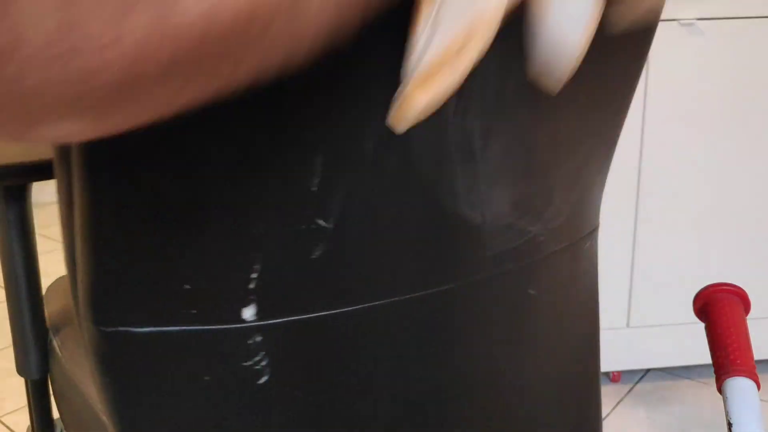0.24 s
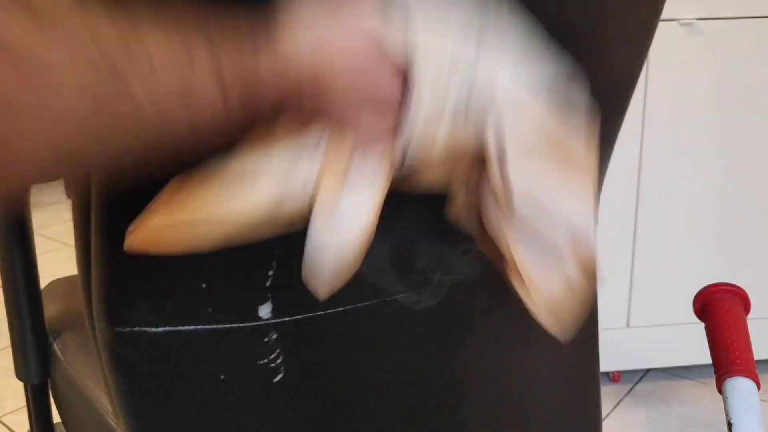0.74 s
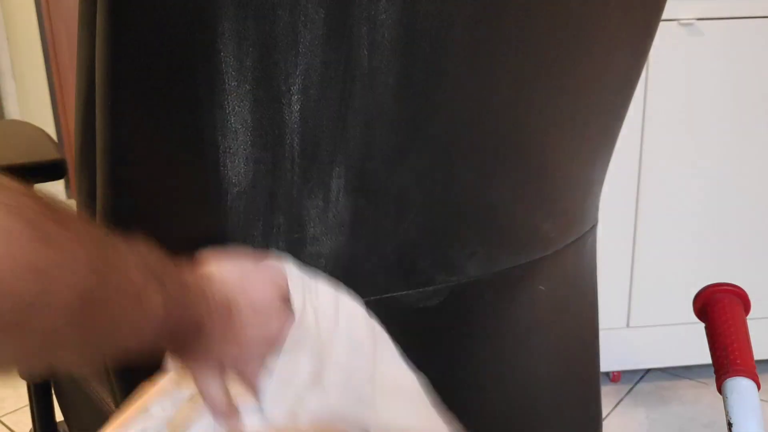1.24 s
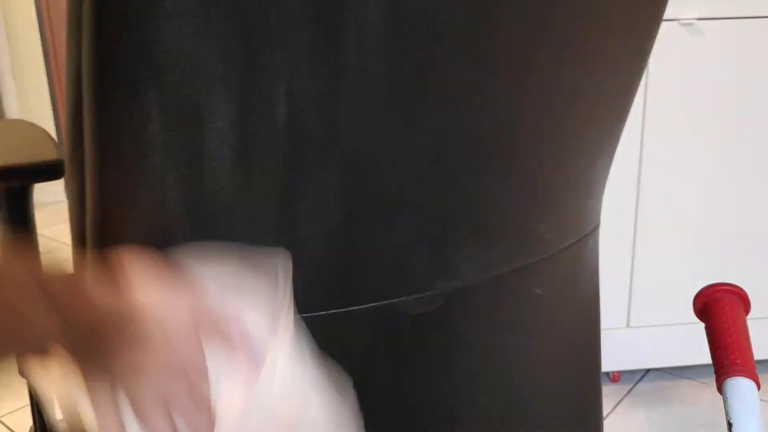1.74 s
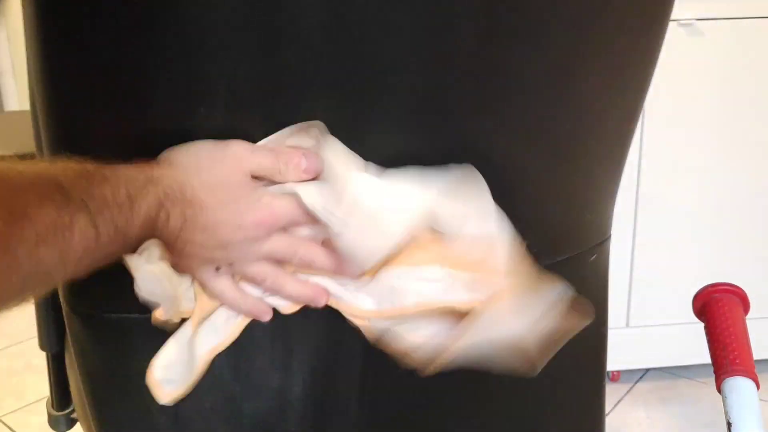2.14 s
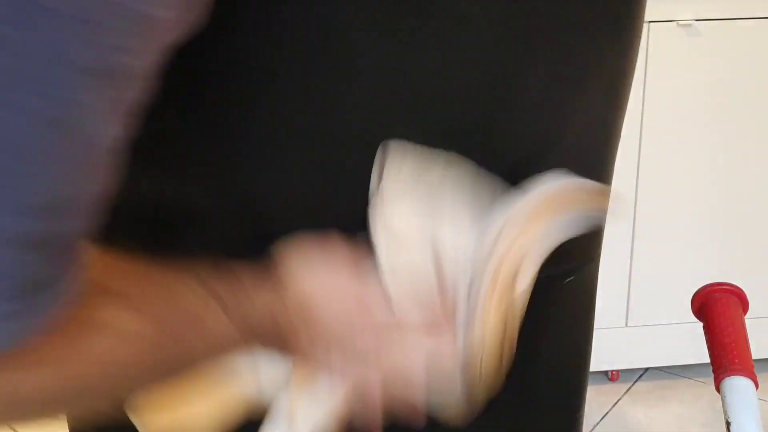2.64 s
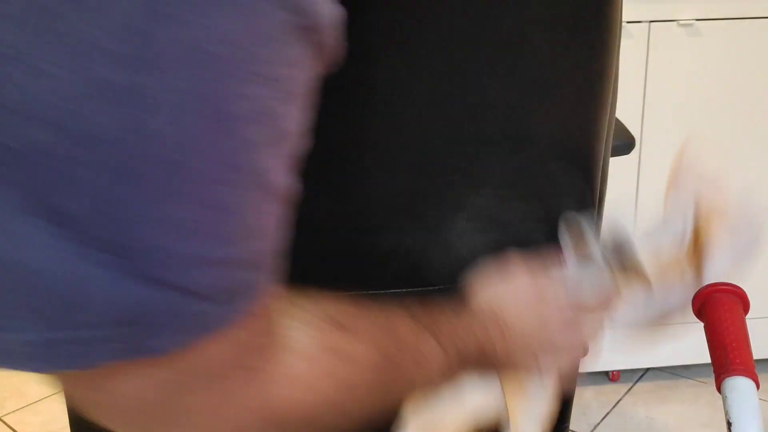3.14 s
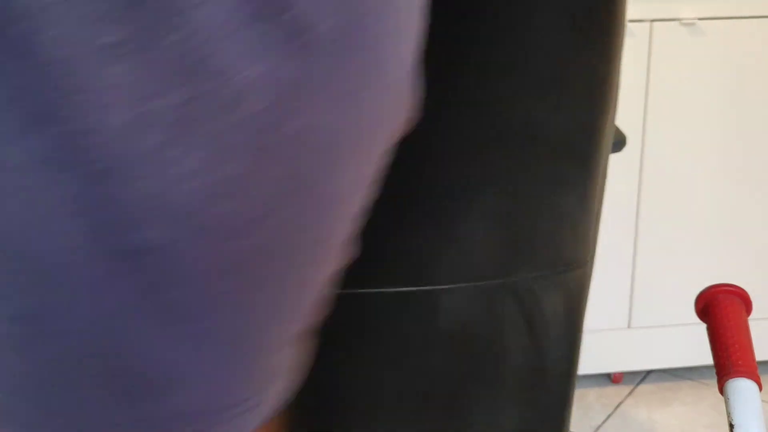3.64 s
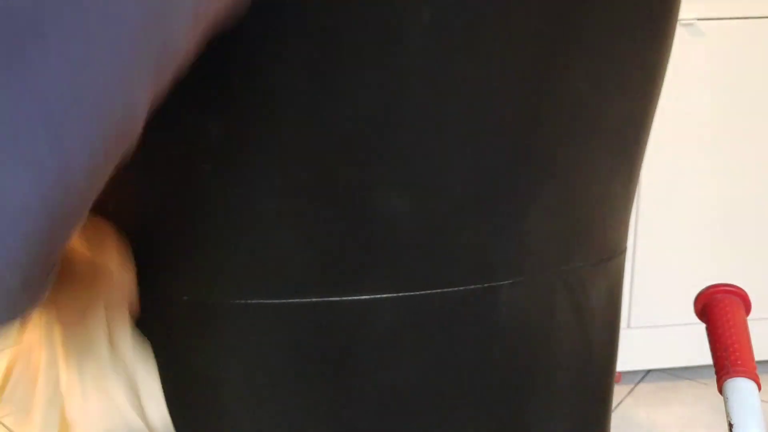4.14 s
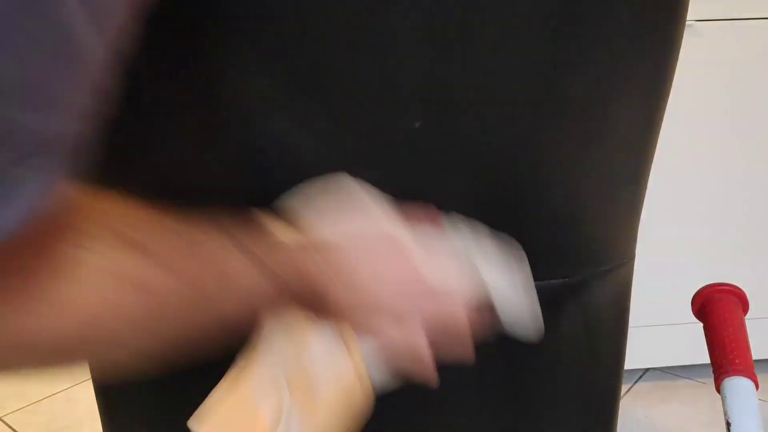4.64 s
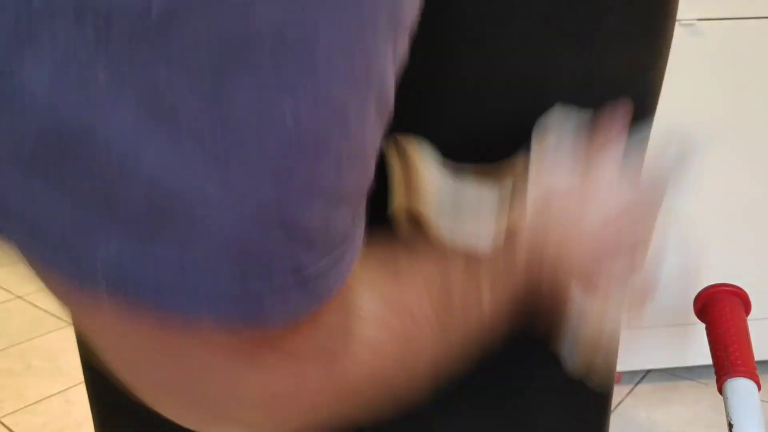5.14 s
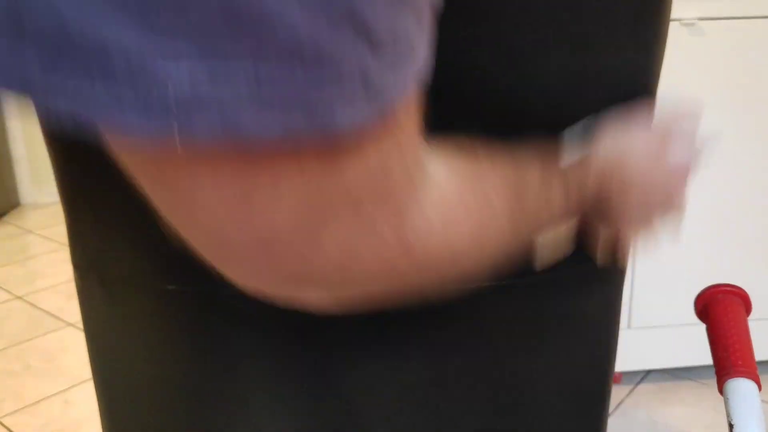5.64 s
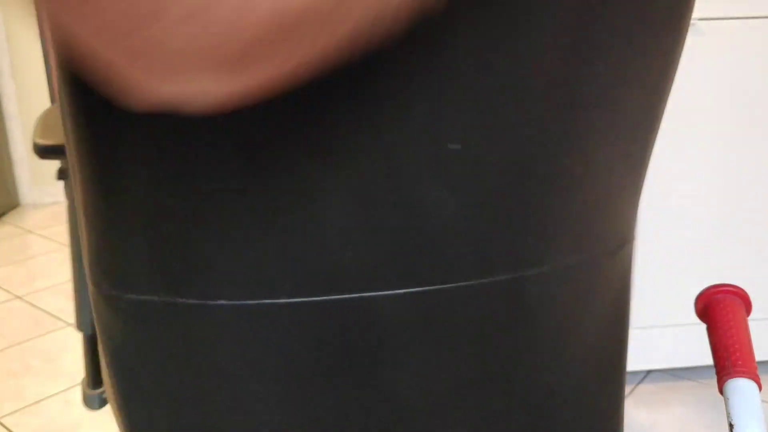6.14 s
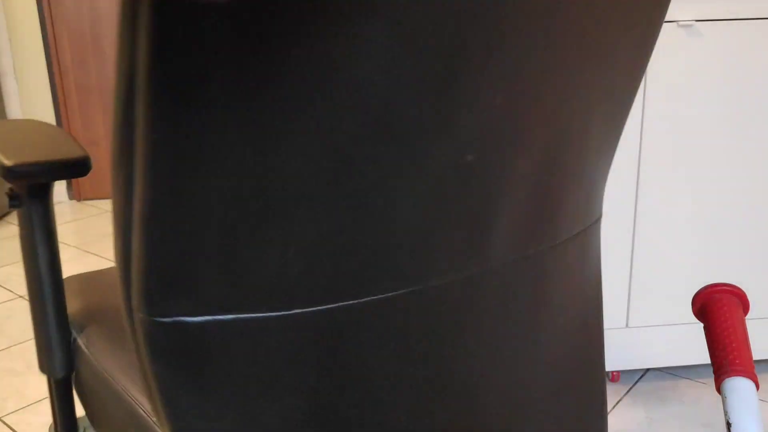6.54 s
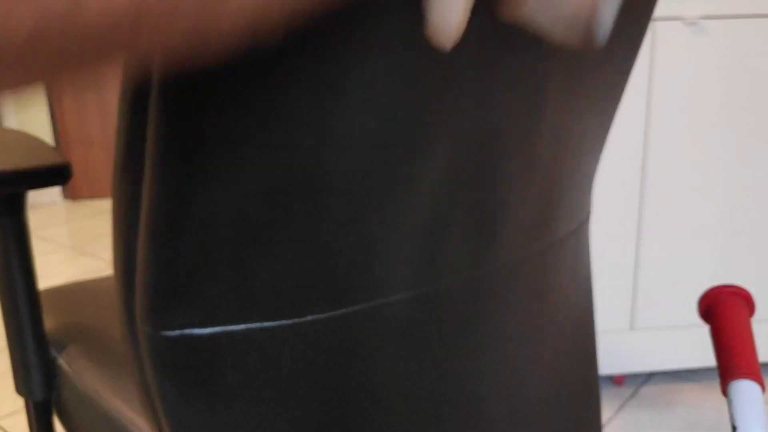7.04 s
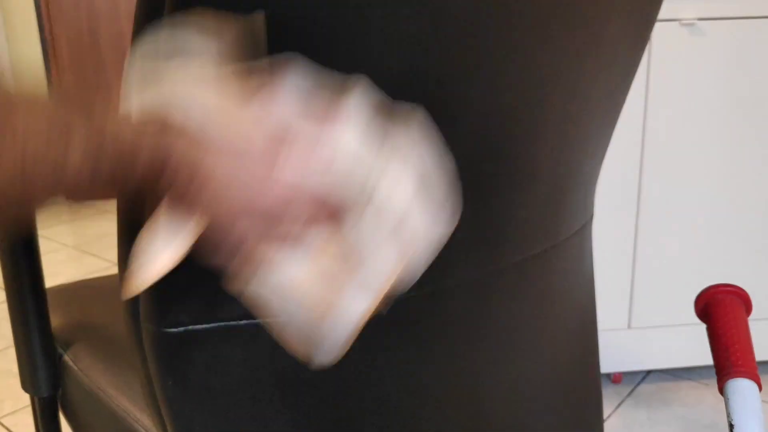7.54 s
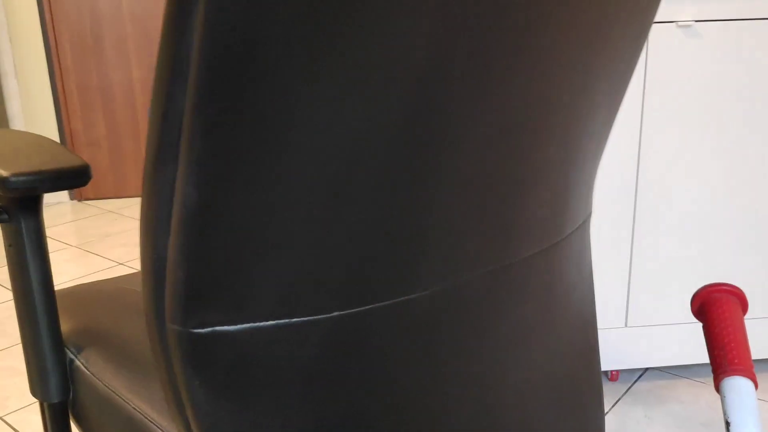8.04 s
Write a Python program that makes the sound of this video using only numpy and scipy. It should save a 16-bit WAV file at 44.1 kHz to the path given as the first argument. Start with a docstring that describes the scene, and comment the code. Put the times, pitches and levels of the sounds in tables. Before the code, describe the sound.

A cloth rag wipes the leather back of an office chair from the start, in quick, uneven strokes, about four a second, each a dry swelling hiss. Soft padded thuds and slight stirs of air follow the hand. A loose end slaps the leather loudest at about 0.5 seconds, with lighter slaps near 1.2, 2 and 5.1 seconds. Shoves draw short, low booms from the chair, strongest around 2 and 2.8 seconds, where the rag also catches an edge with one sharp tick. Now and then the cloth grips in a very brief groan, as near 1.6, 3, 4.9 and 7.3 seconds. The wiping is somewhat softer from 3 to 6 seconds, firms up again, then eases around 8 seconds. The stereo microphone is close to the chair, in a small tiled room with quiet room tone and a faint appliance hum.

```python
"""A quick to-and-fro hiss: a cloth rag wiping the leather back of an office chair, its fibres catching
on the grain. Small tiled room, stereo microphone close to the chair. The bunched cloth drums on the
padding and the arm stirs the air, over quiet room tone and a faint appliance hum. Loose ends slap the
leather at the turns, shoves make the chair back boom, the rag grips in short groans, and once it ticks
on an edge."""
import sys
import numpy as np
from scipy import signal
from scipy.fft import rfft, irfft
from scipy.io import wavfile
from scipy.ndimage import uniform_filter1d

SR = 44100
rng = np.random.default_rng(int(sys.argv[2]) if len(sys.argv) > 2 else 0)


def generate_wav(signal):
    """Clip the signal to [-1, 1] and save it as 16-bit WAV at the path in sys.argv[1]."""
    frames = np.transpose(np.atleast_2d(signal))
    scaled = np.clip(frames, -1, 1) * 32767
    pcm = np.round(scaled).astype(np.int16)
    wavfile.write(sys.argv[1], SR, pcm)


N = 364751
TIME, FREQ = np.arange(N) / SR, np.fft.rfftfreq(N, 1 / SR)


def amp(db):
    return 10 ** (np.asarray(db) / 20)


def unit_rms(x):
    return x / np.sqrt(np.mean(x ** 2) + 1e-20)


def curve_at(points, hz):
    """A table of (f, value), joined on a log-frequency axis."""
    f, value = np.transpose(points)
    return np.interp(np.log(hz + 1), np.log(f + 1), value)


def add(mix, start_s, sound):
    part = mix[max(round(start_s * SR), 0):][:len(sound)]
    part += sound[:len(part)]


def wander(rate_hz):
    """Smooth random drift of unit size, up to about the given rate."""
    return unit_rms(irfft(rfft(rng.standard_normal(N)) / (1 + (FREQ / rate_hz) ** 4), N))


def swells(rows):
    """Half a sine for each row of (middle t/s, length/s, height)."""
    out = np.zeros(N)
    for s, length, height in rows:
        add(out, s - length / 2, height * np.sin(np.linspace(0, np.pi, round(length * SR))))
    return out


# Stereo width at the microphone: f/Hz, side minus mid level/dB
WIDTH = [(30, -16), (150, -17), (350, -12.5), (550, -7), (1000, -3.2), (2000, -1.2), (4000, 0)]
def at_microphone(pair, colour, band_hz):
    """Colours two noises, unit mid level in the band; long waves reach both microphone ports alike."""
    mid, side = rfft(pair) * amp(curve_at(colour, FREQ))
    side = side * amp(curve_at(WIDTH, FREQ))
    level = np.std(irfft(mid * (FREQ > band_hz[0]) * (FREQ < band_hz[1]), N))
    return irfft(np.array([mid + side, mid - side]), N) / level


def slips(per_s, spread_db, share):
    """Friction force: countless tiny slips blur into noise, and a share of larger catches stands out."""
    sizes = amp(spread_db * np.minimum(rng.exponential(1, N), 3))
    caught = rng.random(N) < per_s / SR
    catches = unit_rms(sizes * caught * rng.choice([-1, 1], (2, N)))
    return np.sqrt(share) * catches + np.sqrt(1 - share) * rng.standard_normal((2, N))


# Sweeps of the hand, close to the microphone: fastest t/s, rise/s, fall/s, cloth hiss level/dB,
# palm rub re hiss/dB, fibre fizz re hiss/dB, palm hollow at full speed f/Hz, drumming level/dB
STROKES = [(0.014, 0.16, 0.16, -51, 0, -1, 1460, -59.5), (0.188, 0.22, 0.24, -53, 2.0, -1.5, 1740, -66),
           (0.435, 0.15, 0.17, -46, -1.5, -3, 2250, -65.5),
           (0.585, 0.18, 0.13, -51.5, -3, 2.5, 1000, -57.5),
           (0.689, 0.12, 0.27, -48, -1.5, -1, 1870, -63.5),
           (1.091, 0.24, 0.093, -45.0, -4, -3.5, 2100, -59.5),
           (1.265, 0.14, 0.19, -47, -4, -4.5, 2110, -56.5),
           (1.651, 0.28, 0.29, -50.5, -1.5, -3.0, 1650, -62.5),
           (2.022, 0.18, 0.08, -48.0, -2, -0.5, 2210, -54.5),
           (2.219, 0.18, 0.15, -48, -3.5, -1.5, 1800, -59),
           (2.43, 0.12, 0.16, -49.5, -1.5, -3, 2330, -54.5), (2.612, 0.1, 0.15, -46.5, -1, -7.5, 1370, -57),
           (2.813, 0.13, 0.15, -48, -2.5, -4, 2000, -51.5),
           (3.096, 0.35, 0.27, -52.0, 0.5, 0.5, 1440, -65.5), (3.33, 0.03, 0.12, -60.5, -2, 1, 1680, -62),
           (3.54, 0.11, 0.11, -54, -1, -2.5, 1860, -60.5),
           (3.638, 0.067, 0.32, -52.0, -4.0, -11, 1980, -62.5),
           (4.144, 0.28, 0.19, -53.5, -1.5, -3, 1450, -61),
           (4.386, 0.15, 0.12, -59.5, 2.5, -1.0, 1270, -64), (4.615, 0.2, 0.18, -51, 4, -3.5, 1310, -58),
           (4.907, 0.19, 0.09, -47.5, -2.5, 1, 1490, -69), (5.067, 0.2, 0.3, -55.5, 1.0, -5, 1380, -63.5),
           (5.546, 0.2, 0.16, -54.5, 2.5, -1, 1350, -60.5), (5.809, 0.43, 0.2, -56.5, 3, -5.5, 1670, -78),
           (6.074, 0.15, 0.097, -54.5, 4, -3.5, 1760, -67), (6.17, 0.077, 0.098, -49, 0, -13, 2130, -56.5),
           (6.432, 0.26, 0.13, -46.5, -2.5, -8, 2400, -63.5),
           (6.735, 0.27, 0.076, -47, -2.0, -14, 1820, -70), (7.003, 0.28, 0.14, -47, -2.5, -6.5, 1820, -71),
           (7.327, 0.28, 0.087, -48, -2.5, -6, 1730, -69),
           (7.599, 0.34, 0.18, -49.0, -0.5, -10.5, 1800, -69),
           (7.964, 0.29, 0.12, -57.0, 3.0, -4.5, 1510, -64), (8.213, 0.17, 0.11, -53.5, 2, -7, 1810, -69.5)]
def sweep(levels_db, power, swing=0.77, turn_pitch=0.68):
    """Amplitude growing as hand speed to a power, and the palm hollow's pitch, sinking at the turns."""
    energy, weighted_hz = np.full(N, 1e-14), np.full(N, 1e-11)
    for (s, rise, fall, *_, hollow_hz, _), db in zip(STROKES, levels_db):
        span = slice(max(round((s - rise) * SR), 0), round((s + fall) * SR))
        ramp = np.interp(TIME[span] - s, [-rise, 0, fall], [0, 1, 0])
        speed = np.clip(ramp + swing * (np.sin(np.pi / 2 * ramp) - ramp), 0, 1)  # swing 1: a pendulum
        stroke_energy = (amp(db) * speed ** power) ** 2
        energy[span] += stroke_energy
        weighted_hz[span] += stroke_energy * hollow_hz * (turn_pitch + (1 - turn_pitch) * speed)
    return np.sqrt(energy), weighted_hz / energy


# Rub under the palm, its hollow at 1400 Hz: f/Hz, relative level/dB
PALM_RUB = [(200, -29), (450, -8.5), (700, -2), (1000, -0.5), (1400, -1.5), (2000, -5.5), (3000, -12.5),
            (6000, -21)]
def folds(pair, patchy_db, hollow_hz=None):
    """Shifting folds favour one pitch, then another; the palm's hollow, if given, tunes the rub."""
    hz, t, spectra = signal.stft(pair, SR, nperseg=1024, noverlap=768)
    patches = uniform_filter1d(rng.standard_normal(spectra.shape[1:]), size=5, axis=0)
    patches = unit_rms(uniform_filter1d(patches, size=7, axis=1))
    gain = amp(patchy_db * patches)
    if hollow_hz is not None:
        slide = np.interp(t, TIME, hollow_hz) / 1400
        tuned = amp(curve_at(PALM_RUB, hz[:, None] / slide))
        gain = gain * tuned / np.sqrt(np.mean(tuned[(hz > 900) & (hz < 2200)] ** 2, axis=0))
    return signal.istft(spectra * gain, SR, nperseg=1024, noverlap=768)[1][:, :N]


# The hand bears down and the rag bites: middle t/s, length/s, extra hiss level/dB
BITES = [(.69, 0.096, 1.5), (1.078, 0.17, 1.5), (2.014, 0.087, 4), (2.196, 0.089, 4), (2.454, 0.082, 2.5),
         (2.654, 0.032, 2), (2.795, 0.032, 4.5), (2.842, .09, 5.5), (3.699, 0.13, 3), (4.631, 0.036, 1),
         (5.105, 0.13, 4.5), (6.173, 0.078, 3), (6.756, 0.083, 2.5), (7.346, .06, 3.5)]
# Close up: cloth hiss, the leather's radiation of the rub, fibre fizz: f/Hz, relative level/dB
CLOTH_HISS = [(300, -15), (900, -20), (1600, -7.5), (2400, -2), (3500, -2), (5000, -3), (7000, -1),
              (9000, -8), (14000, -12.5)]
LEATHER_RADIATION = [(300, -8), (800, -1), (2500, 1), (6000, -4)]
FIBRE_FIZZ = [(2000, -43), (5500, -4), (8500, 2), (11000, 3.5), (14000, 3)]
def wiping(creep_db=-65.5):
    """Cloth slides over the grain, still creeping at the turns; uneven grip shakes all the friction."""
    hiss_db, rub_db, fizz_db = np.transpose(STROKES)[3:6]
    sliding = np.hypot(sweep(hiss_db, power=1.22)[0], amp(creep_db))
    rubbing, hollow_hz = sweep(hiss_db + rub_db, power=1.17)
    brushing = np.hypot(sweep(hiss_db + fizz_db, power=1.08)[0], amp(creep_db - 2.5))
    grip = wander(rate_hz=18)
    bite_db = swells(BITES)
    grain = slips(per_s=3000, spread_db=3, share=.2)
    weave = slips(per_s=900, spread_db=3, share=.25)
    fibres = slips(per_s=4000, spread_db=3, share=.25)
    hiss = at_microphone(folds(grain, patchy_db=2.0), CLOTH_HISS, band_hz=(2800, 7000))
    under_palm = folds(weave, patchy_db=2.5, hollow_hz=hollow_hz)
    rub = at_microphone(under_palm, LEATHER_RADIATION, band_hz=(900, 2200))
    fizz = at_microphone(fibres, FIBRE_FIZZ, band_hz=(8500, 14000))
    # a bite lifts the fizz most, so bearing down brightens the cloth
    return (hiss * sliding * amp(bite_db + 0.68 * grip)
            + rub * rubbing * amp(0.52 + 0.79 * bite_db + 0.46 * grip)
            + fizz * brushing * amp(-0.57 + 1.7 * bite_db + 0.52 * grip))


def pressing():
    """How hard the moving hand works the padding, as an amplitude."""
    return sweep([stroke[-1] for stroke in STROKES], power=0.79)[0]


# Thuds in the chair's padding: f/Hz, relative level/dB
PADDING = [(50, -20), (100, -4.5), (135, -9), (180, -4.5), (260, -4), (400, 0), (600, -0.5), (900, -4.5),
           (1600, -14), (4000, -57)]
def drumming():
    """Folds roll under the hand and thud softly into the padding."""
    force = slips(per_s=150, spread_db=3.5, share=0.48) * amp(1.8 * wander(rate_hz=14.5))
    thuds = at_microphone(force, PADDING, band_hz=(150, 600))
    return thuds * pressing() * amp(0.96 * swells(BITES))


# Moving air at the microphone: f/Hz, relative level/dB
DRAUGHT = [(10, -1), (24, 2), (45, -3), (70, -16.5), (120, -10), (250, -23), (800, -54)]
def draught(rest_db=-66.5, re_drumming_db=-9):
    """The arm stirs a faint draught into low buffeting with each stroke."""
    buffet = at_microphone(rng.standard_normal((2, N)), DRAUGHT, band_hz=(25, 120))
    return buffet * np.hypot(amp(rest_db), amp(re_drumming_db) * pressing())


# Room tone behind the chair: f/Hz, relative level/dB
ROOM_TONE = [(30, 15), (120, -2), (300, 2), (700, 4.5), (1500, -2.5), (4000, -8), (14000, -32)]
# An appliance in the room: f/Hz, rms level/dB
HUM = [(252, -76), (510, -75.5)]
def room_tone(noise_db=-66.5):
    """Steady, quiet noise and the faintly wavering hum of an appliance."""
    out = amp(noise_db) * at_microphone(rng.standard_normal((2, N)), ROOM_TONE, band_hz=(100, 14000))
    for hz, db in HUM:
        peak = np.sqrt(2) * amp(db + 1.8 * wander(rate_hz=1.2))
        cycles = np.cumsum(hz + 3 * wander(rate_hz=12.4)) / SR
        out += peak * np.sin(2 * np.pi * cycles)
    return out


# Decay of the small tiled room: f/Hz, t60/s
ROOM_DECAY = [(150, 0.22), (600, 0.62), (2000, 0.15), (10000, 0.04)]
def reverb(dry):
    """Dense reflections off tiles and cupboards; the treble dies first."""
    hz, t, spectra = signal.stft(rng.standard_normal((2, SR // 2)), SR, nperseg=256)
    decay = amp(-60 * t / curve_at(ROOM_DECAY, hz)[:, None])
    tail = signal.istft(spectra * decay, SR, nperseg=256)[1]
    tail[:, :SR // 250] = 0  # reflections reach the microphone 4 ms late
    mid, side = signal.fftconvolve(np.atleast_2d(dry), tail / np.linalg.norm(tail[0]), axes=1)[:, :N]
    side = irfft(rfft(side) * amp(curve_at(WIDTH, FREQ)), N)
    return np.array([mid + side, mid - side])


# Loose ends hit the leather: t/s, puff level/dB, f/Hz before pitch_ratio, crack re puff/dB
FLAPS = [(0.336, -37, 1030, -1.5), (0.511, -19.5, 540, -11), (0.5189, -23.5, 376, -5.5),
         (0.525, -31, 468, -8), (0.536, -36, 125, -18), (0.539, -35, 560, -13), (0.922, -39.5, 888, -15),
         (1.1852, -28, 710, -4.5), (1.623, -46, 301, -10), (1.983, -29, 587, -11), (1.996, -33, 888, -8),
         (2.177, -34.5, 1110, 1), (2.652, -39, 832, -17), (2.818, -33, 413, -6), (4.106, -36, 409, -14),
         (4.622, -36.5, 503, -8), (4.898, -40.5, 280, 4), (5.113, -32, 330, -2), (5.124, -39, 480, 0),
         (5.1414, -27.5, 680, -9), (5.835, -40.5, 383, 3.5), (6.292, -36.5, 700, -9), (6.714, -39, 659, -8)]
# Modes of the chair back: f/Hz, level re puff/dB, t60/s
CHAIR_MODES = [(137, -19, .09), (253, -23, .12), (392, -25, .06), (513, -27, .09), (621, -28, .05),
               (823, -28, .05), (1100, -29, .05), (1268, -28, .05)]
def flaps(pitch_ratio=0.85, contact_s=0.00197, ring_rise_s=0.00079, crack_decay_s=.004):
    """Each flap squeezes out a puff of air, cracks on the leather and sets the chair back ringing."""
    t, out = np.arange(SR // 5) / SR, np.zeros(N)
    for s, db, hz, crack_db in FLAPS:
        pulse_time = np.pi * hz * pitch_ratio * (t - .002)
        puff = (1 - 2 * pulse_time ** 2) * np.exp(-pulse_time ** 2)
        ring = sum(amp(mode_db - 60 * t / t60) * np.sin(2 * np.pi * f * t + rng.uniform(0, 2 * np.pi))
                   for f, mode_db, t60 in CHAIR_MODES)
        ring *= 1 - np.exp(-t / ring_rise_s)
        # a heavier fold gives a lower puff and a duller crack
        cloth = signal.butter(3, [.5 * hz, 1300 + hz], "band", fs=SR, output="sos")
        crack = unit_rms(signal.sosfilt(cloth, rng.standard_normal(len(t)))) * np.exp(-t / crack_decay_s)
        add(out, s, amp(db) * puff)
        add(out, s + contact_s, amp(db) * (ring + amp(crack_db) * crack))
    return out + amp(-14) * reverb(out)


# Hard shoves on the chair: middle t/s, length/s, level/dB
SHOVES = [(0.507, .06, -60), (0.921, 0.058, -55), (1.26, .06, -55.5), (1.938, 0.065, -51),
          (2.007, 0.11, -48.5), (2.216, 0.067, -67), (2.417, 0.17, -53.5), (2.603, 0.091, -70),
          (2.79, .05, -49.5), (2.88, 0.061, -53), (4.379, 0.093, -54.5), (4.64, 0.054, -58),
          (4.91, 0.084, -57.5), (5.12, .09, -59), (5.86, 0.069, -55), (6.17, 0.09, -62), (6.453, 0.14, -68),
          (6.857, 0.11, -56.5), (7.37, 0.14, -56.5)]
# Boom of the chair back, close up: f/Hz, relative level/dB
CHAIR_BOOM = [(25, 4.5), (60, 4), (90, -5), (150, -14.5), (300, -8.5), (800, -42)]
def shoves():
    """Each shove rocks the chair back into a short, low boom."""
    boom = at_microphone(rng.standard_normal((2, N)), CHAIR_BOOM, band_hz=(25, 120))
    return boom * swells([(s, length, amp(db)) for s, length, db in SHOVES])


# The rag grips and drags the leather: middle t/s, length/s, f/Hz, level/dB before lift_db
GROANS = [(1.086, 0.1, 324, -58), (1.645, .07, 344.7, -51), (1.926, 0.043, 287, -56),
          (2.44, 0.077, 2990, -49), (2.651, .04, 895, -48), (3.026, .08, 470.3, -51),
          (3.36, 0.065, 564, -54), (3.812, 0.21, 547, -64), (4.898, .05, 311, -49.5),
          (5.544, .08, 398, -52.5), (6.175, .09, 324, -63), (6.3, 0.052, 766, -51.5),
          (6.753, 0.074, 628, -51), (7.344, .065, 380.5, -51), (7.798, .1, 236.5, -60)]
def groans(jitter=0.0884, rough_db=3.0, lift_db=1.5):
    """Uneven stick and slip: a wavering, smeared, stuttering tone that swells and lets go."""
    out = np.zeros(N)
    for s, length, hz, db in GROANS:
        t = np.arange(round(length * SR)) / SR
        smooth = signal.butter(2, 70 + hz / 10, fs=SR, output="sos")
        cos_gain, sin_gain, drift = signal.sosfilt(smooth, rng.standard_normal((3, SR // 2)))[:, -len(t):]
        phase = 2 * np.pi * np.cumsum(hz * (1 + jitter * unit_rms(drift))) / SR
        tone = unit_rms(cos_gain * np.cos(phase) + sin_gain * np.sin(phase))
        add(out, s - length / 2, amp(db) * tone * np.sin(np.pi * t / length))
    out *= amp(rough_db * wander(rate_hz=330) + lift_db)
    return out + amp(-12) * reverb(out)


# One sharp tick, close and dry: level/dB, f/Hz, t60/s
EDGE_TICK = (-23, 7100, .01)
def tick(at_s=2.7908):
    """The rag catches an edge: a tiny crack with a brief high ring."""
    db, hz, t60 = EDGE_TICK
    t, out = np.arange(SR // 20) / SR, np.zeros(N)
    contact = np.sin(2 * np.pi * hz * t) + .5 * rng.standard_normal(len(t))
    add(out, at_s, amp(db - 60 * t / t60) * contact)
    return out


def scene():
    """The rag on the chair, close by in the quiet room."""
    return wiping() + drumming() + draught() + room_tone() + flaps() + shoves() + groans() + tick()


# Balance of the two microphone ports: f/Hz, left minus right level/dB
PORT_BALANCE = [(100, -1.5), (450, -2), (750, 1), (1800, -0.5), (4800, -1.7), (6000, -4), (7000, -7.5),
                (8500, 0.5), (10000, 5.5), (12000, 12), (14000, 14)]
def record(dry, cutoff_hz=14330):
    """The microphone's right port rings near 7 kHz, the left is brighter above it; then a low-pass."""
    lean = amp(curve_at(PORT_BALANCE, FREQ) / 2)
    ports = np.array([lean, 1 / lean]) / np.sqrt((lean ** 2 + lean ** -2) / 2)
    coloured = irfft(rfft(dry) * ports, N)
    lowpass = signal.firwin(801, cutoff_hz, window=("kaiser", 8), fs=SR)
    return signal.oaconvolve(coloured, lowpass[None], "same")


dry = scene()
out = record(dry)
generate_wav(out)
```